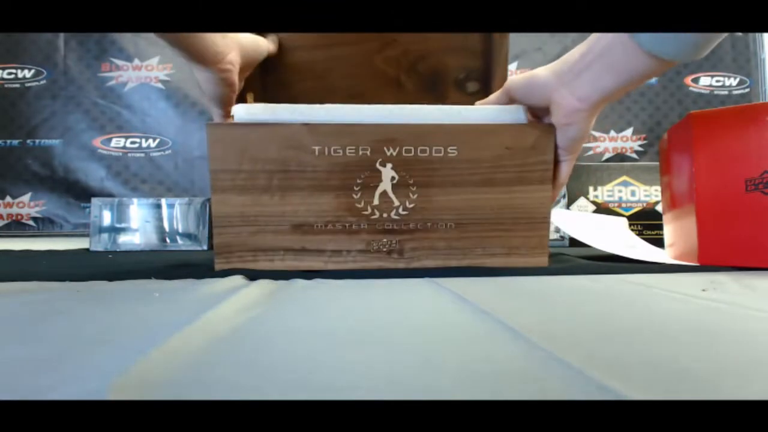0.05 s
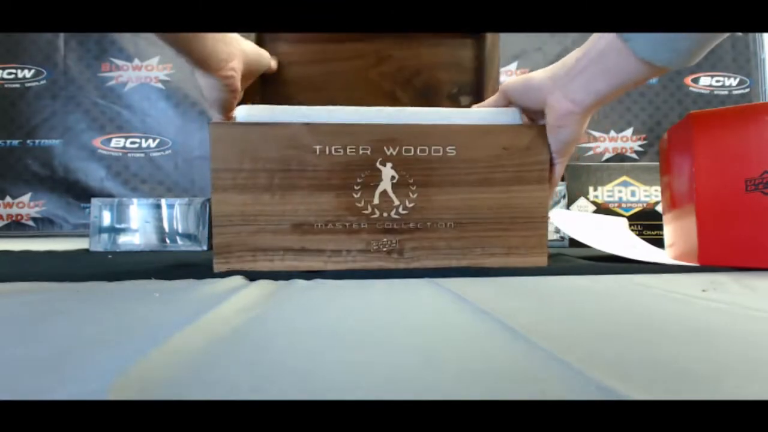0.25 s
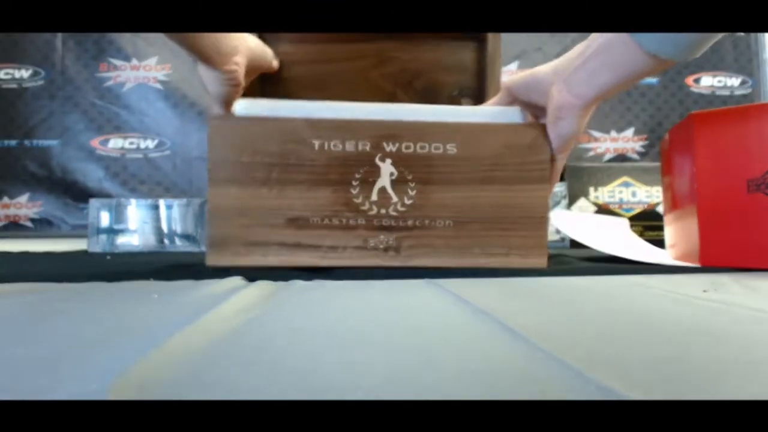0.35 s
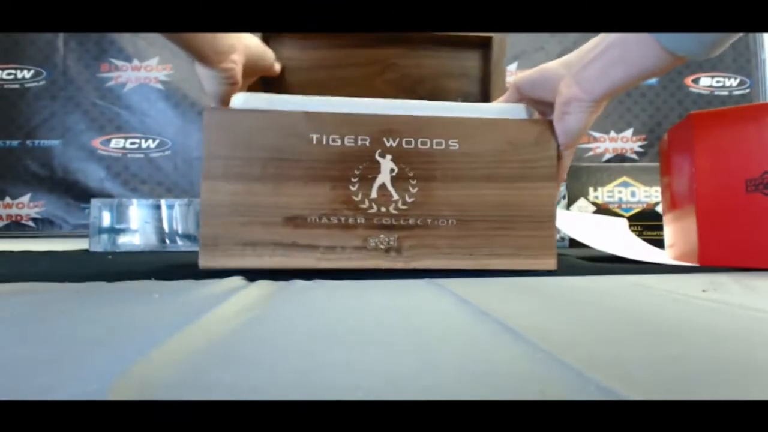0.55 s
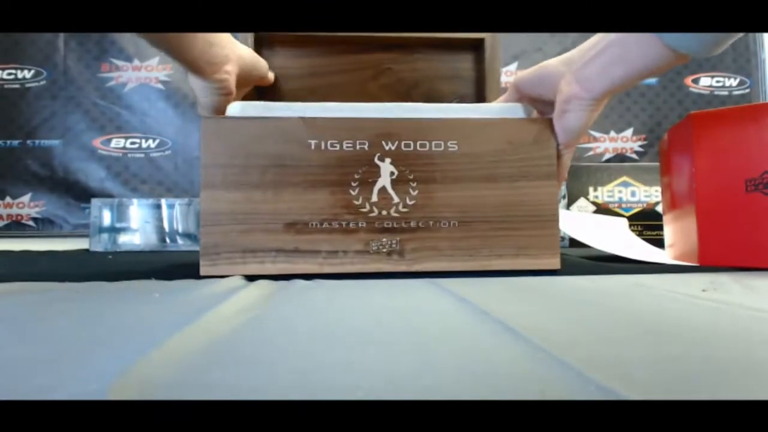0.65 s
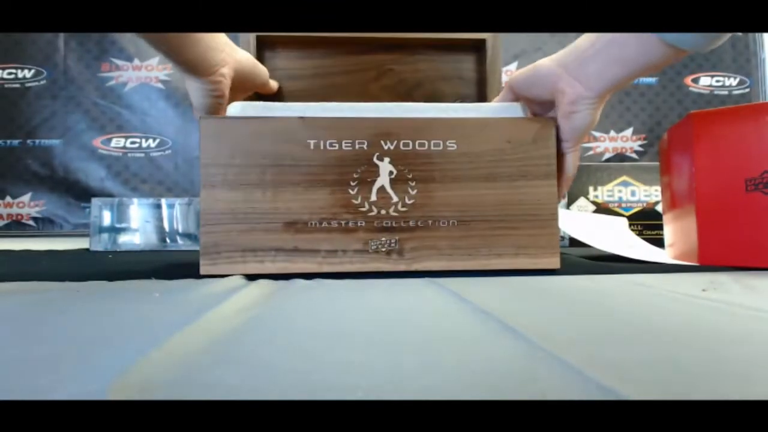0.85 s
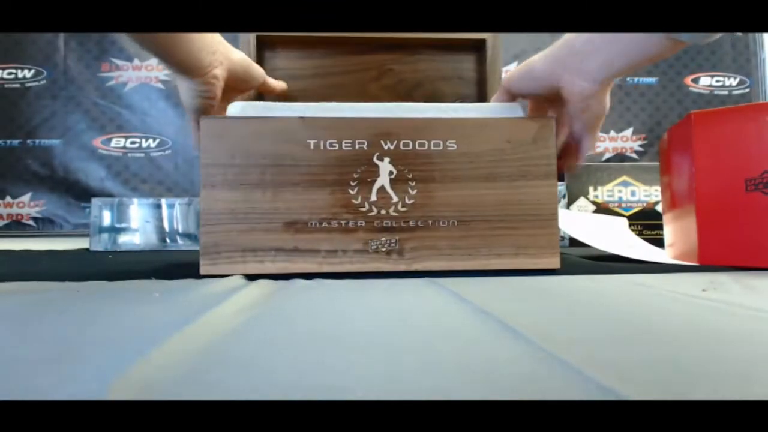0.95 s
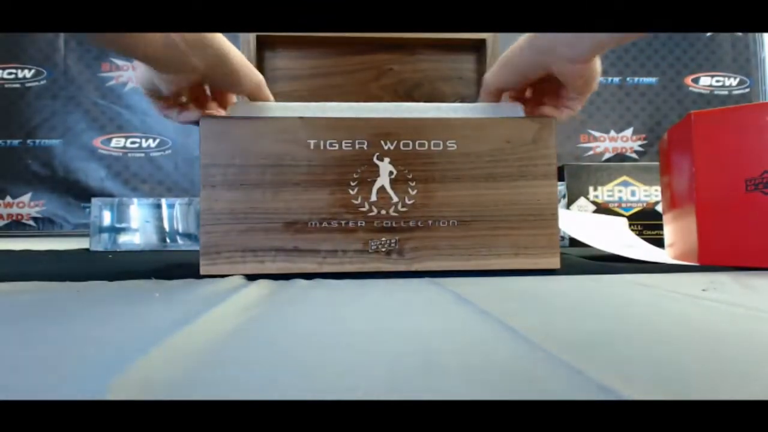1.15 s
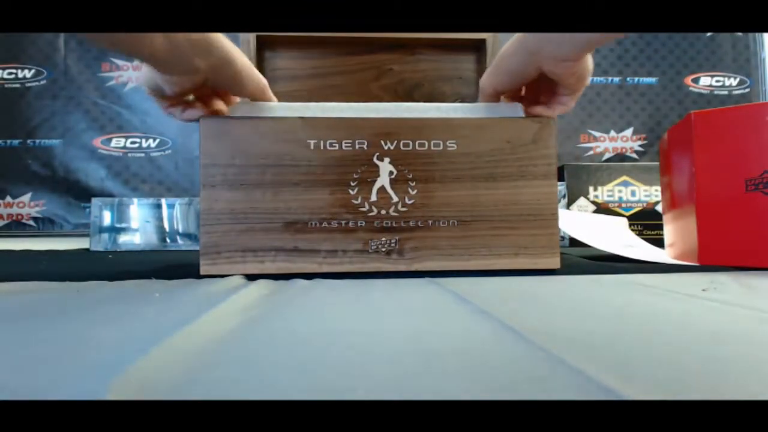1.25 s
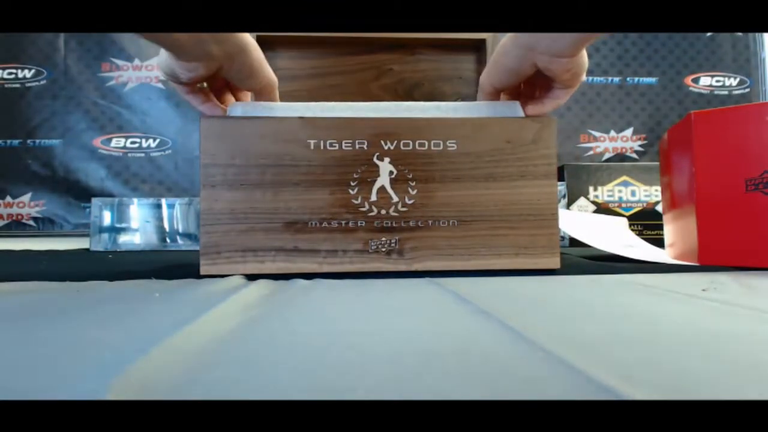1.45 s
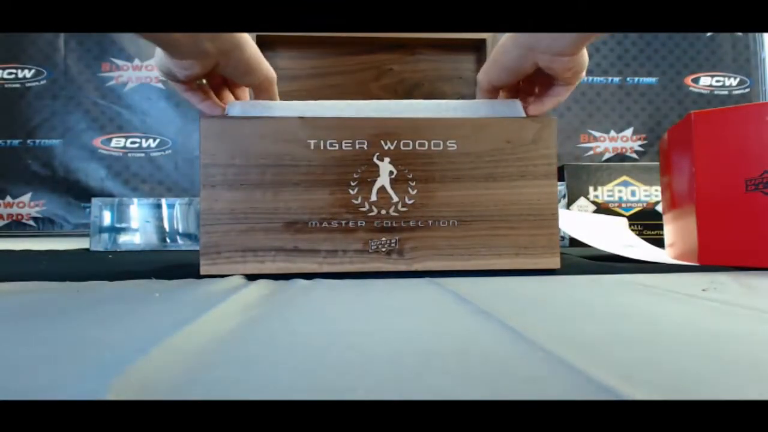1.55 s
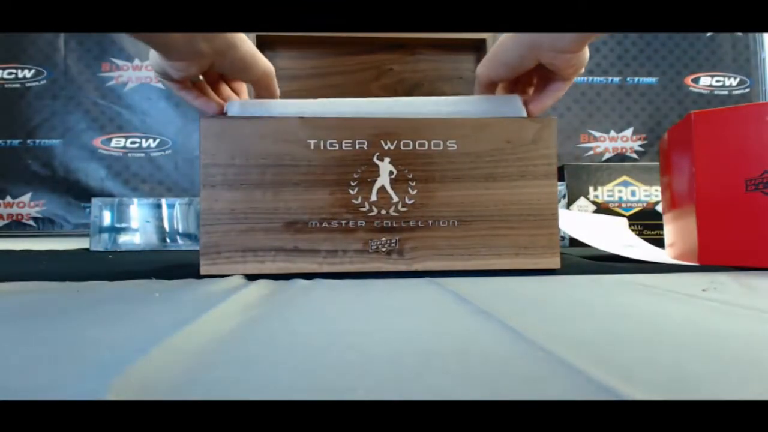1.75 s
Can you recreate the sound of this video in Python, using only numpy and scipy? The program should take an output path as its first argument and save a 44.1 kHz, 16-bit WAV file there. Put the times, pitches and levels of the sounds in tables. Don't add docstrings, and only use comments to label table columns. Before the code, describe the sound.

Wooden box handling: soft scraping and low thumps, a hollow triple knock, then faint foam rubbing

```python
import sys
import numpy as np
from scipy import signal
from scipy.io import wavfile
from scipy.ndimage import uniform_filter1d

SR = 44100
rng = np.random.default_rng(int(sys.argv[2]) if len(sys.argv) > 2 else 0)


def output_pcm(signal):
    pcm = np.clip(np.atleast_2d(signal).T, -1, 1) * 32767
    wavfile.write(sys.argv[1], SR, np.round(pcm).astype(np.int16))


def linear_from_db(decibels):
    return 10 ** (np.asarray(decibels, float) / 20)


N = 79380


def evened(x):
    return x / np.sqrt(np.mean(x ** 2) + 1e-20)


def curve(points):
    return np.interp(np.arange(N) / SR, *np.transpose(points))


def add(mix, start_s, sound):
    part = mix[round(start_s * SR):][:len(sound)]
    part += sound[:len(part)]


def body(x, peaks, tilt_db=0):
    out = 0
    for hz, width_hz, db in peaks:
        pole = np.exp((-np.pi * width_hz + 2j * np.pi * hz) / SR)
        gain = 1 - abs(pole)
        once = signal.lfilter([gain], [1, -pole], x)
        twice = signal.lfilter([gain], [1, -pole], once).real
        out = out + linear_from_db(db + tilt_db * np.log2(hz / 4000)) * twice
    return out


def ring(modes):
    t = np.arange(SR // 3) / SR
    return sum(linear_from_db(db - 60 * t / t60_s) * np.sin(2 * np.pi * hz * t) for hz, db, t60_s in modes)


def air(spectrum, level_db, patchy_db):
    bin_hz = np.fft.rfftfreq(2048, 1 / SR)
    real, imag, patches = rng.standard_normal((N // 512 + 5, 1025, 3)).T
    patches = uniform_filter1d(patches, size=14, axis=0)
    patches = evened(uniform_filter1d(patches, size=6, axis=1))
    hz, db = np.transpose(spectrum)
    colour_db = np.interp(np.log(bin_hz + 1), np.log(hz + 1), db, left=-100, right=-100)
    bins = (real + 1j * imag) * linear_from_db(colour_db[:, None] + patchy_db * patches)
    noise = signal.istft(bins, nperseg=2048, noverlap=1536)[1][:N]
    return linear_from_db(level_db) * evened(noise)


# f/Hz, density/dB per Hz
FAN_ROAR = [(40, -23.5), (70, -36.5), (130, -40.5), (200, -36), (400, -46), (700, -43.5), (1230, -39.5),
            (1500, -39.5), (1800, -54.5)]
# f/Hz, density/dB per Hz
MIC_HISS = [(1000, -17.5), (1700, 0), (1970, -2.5), (3470, -15), (4060, -13.5), (4540, -18), (15600, -26)]
# f/Hz, level/dB
MOTOR_LINES = [(60, -77.5), (89, -63.5)]
# f/Hz, width/Hz, level/dB
BLADE_TONES = [(1021, 60, 0), (1414.4, 72, 0)]


def room():
    t = np.arange(N) / SR
    out = air(FAN_ROAR, level_db=-49, patchy_db=0.98) + air(MIC_HISS, level_db=-64, patchy_db=1.8)
    for hz, db in MOTOR_LINES:
        waver_rad = 0.39 * np.sin(2 * np.pi * 2.3 * t + hz)
        out += linear_from_db(db + 8) * np.sin(2 * np.pi * hz * t + waver_rad)
    return out + linear_from_db(-60) * evened(body(rng.standard_normal(N), BLADE_TONES))


# t/s, level/dB
SWAY = [(0.0, -27.5), (0.06, -28.5), (0.19, -35), (0.314, -16), (0.376, -17.5), (0.426, -30.5), (0.49, -23),
        (0.59, -34), (0.686, -25), (0.772, -11), (0.852, -14.5), (0.926, -32), (1.088, -20), (1.228, -34.5),
        (1.348, -28), (1.405, -43), (1.45, -29), (1.55, -34), (1.8, -34.5)]
# f/Hz, width/Hz, level/dB
LEG_SHUDDER = [(27, 8, 0)]


def sway():
    rest_hz, sag_hz, crest_s = 20, 12.5, 0.804
    shudder_db = -22
    size = uniform_filter1d(linear_from_db(curve(SWAY) + 3), size=1200)
    turns = np.cumsum(rest_hz - sag_hz * size) / SR
    rocking = np.cos(2 * np.pi * (turns - turns[round(crest_s * SR)]))
    shudder = evened(body(rng.standard_normal(N), LEG_SHUDDER))
    return size * (rocking + linear_from_db(shudder_db) * shudder)


GRAINS_PER_S, GRAIN_SPREAD_DB = 6000, 3.0


def friction(stroke, peaks):
    hits = rng.random(N) < GRAINS_PER_S / SR
    sizes = linear_from_db(GRAIN_SPREAD_DB * np.minimum(rng.exponential(1, N), 4))
    grains = hits * sizes * rng.choice([-1., 1.], N)
    return linear_from_db(curve(stroke)) * evened(body(grains, peaks))


# t/s, level/dB
SLIDE = [(0, -77), (.1, -66), (.17, -63), (.2, -60.5), (.33, -64.5), (.4, -60.5), (.435, -54.5),
         (.475, -69), (.51, -56.5), (.58, -58), (.65, -62.5), (.69, -66), (.712, -54), (.76, -64.5),
         (.8, -75.5), (1.16, -75), (1.26, -63.5), (1.4, -72)]
# f/Hz, width/Hz, level/dB
SLIDE_BODY = [(130, 110, 16.5), (2120, 1800, 6), (4260, 1200, -1), (7280, 2000, -7.5), (9140, 2500, -14),
              (11800, 4600, -18)]


def slide():
    return friction(SLIDE, SLIDE_BODY)


# t/s, level/dB, f/Hz, t60/s, direction/sign
THUMPS = [(.172, -27.5, 104, 0.13, -1), (0.183, -19, 47.5, 0.19, -1), (0.195, -22.5, 62.8, 0.16, 1),
          (.19, -41, 295, 0.15, 1), (0.242, -23, 42, 0.18, 1), (0.261, -30, 29.3, 0.58, 1),
          (.351, -37, 620, 0.045, 1), (.353, -41, 500, .04, 1), (.735, -36, 540, .08, 1),
          (.2, -42, 200, .12, 1), (1.35, -48, 480, .05, 1), (1.62, -50.5, 199.7, 0.27, 1),
          (.86, -38.5, 95, 0.19, 1), (.698, -36, 250, 0.059, 1), (0.374, -27.5, 77.5, 0.099, 1),
          (0.383, -39.5, 205, 0.14, 1), (0.406, -36.5, 111.8, .2, 1), (0.527, -38.5, 85, 0.11, 1),
          (0.584, -32, 33, 0.47, 1), (.61, -40.5, 119, 0.17, 1), (.64, -47.5, 197, 0.23, 1),
          (0.702, -12.5, 33.2, 0.41, 1), (0.704, -16, 62, 0.15, 1), (.728, -26, 371, 0.11, 1),
          (.755, -33, 63.6, 0.17, 1), (0.999, -32.5, 37.6, 0.33, 1), (1.171, -47, 130, 0.14, 1),
          (1.222, -47, 190, 0.084, 1), (1.261, -45, 150, .1, 1), (1.29, -47, 179, .1, 1),
          (1.26, -46, 620, 0.06, 1), (1.25, -39, 29.6, 0.25, 1), (1.401, -53, 44.6, 0.23, 1),
          (1.739, -39, 40.4, 0.22, 1)]


def thumps():
    rise_s = 0.0039
    out, t = np.zeros(N), np.arange(SR // 2) / SR
    rise = 1 - np.exp(-t / rise_s)
    for start_s, db, hz, t60_s, direction in THUMPS:
        decay = linear_from_db(db - 60 * t / t60_s)
        add(out, start_s, np.sign(direction) * rise * decay * np.sin(2 * np.pi * hz * t))
    return out


# t/s, length/s, level/dB, rate/slips per s
CHATTER = [(.7225, .001, -33, 330), (.7265, .001, -35, 330), (.7305, .001, -40, 330),
           (.7365, .001, -35, 300), (.7415, .001, -37, 330), (.749, .001, -43, 330), (.768, .001, -44, 330),
           (.875, .02, -56, 250), (.354, .001, -46, 232), (.3612, .006, -43, 230), (.1757, .085, -49, 200),
           (.549, .015, -46, 250), (.622, .01, -46, 250), (.603, .012, -47, 250), (1.275, .008, -50, 270),
           (1.617, .008, -49, 247)]
# f/Hz, level/dB, t60/s
LID = [(556, -9.5, 0.035), (880, -2.5, 0.025), (1050, 0, 0.03), (1210, 4, 0.031), (1240, -4, 0.039),
       (1360, -21, .05)]


def chatter():
    slip_s, level_spread_db = 0.00073, 5.1
    slips = np.zeros(N)
    for (start_s, length_s, db, rate_hz), (gap, drop) in zip(CHATTER, rng.random((len(CHATTER), 2, 30))):
        at_s = np.cumsum(0.4 + 1.3 * gap) / rate_hz
        at_s = at_s - at_s[0]
        inside = at_s < length_s
        slips[((start_s + at_s[inside]) * SR).astype(int)] += linear_from_db(db - level_spread_db * drop[inside])
    push = np.sin(np.pi * np.arange(0, slip_s, 1 / SR) / slip_s) ** 2
    return signal.fftconvolve(slips, np.convolve(push / push.sum(), ring(LID)))[:N]


# t/s, level/dB, tilt/dB per octave, t60/s
TICKS = [(.1757, -43, -6, .06), (.317, -54, -8, 0.064), (0.31, -60, 0, .015), (.3538, -44, -5.5, 0.051),
         (.3612, -47.5, -4, 0.037), (.5505, -55, 0, 0.027), (.7347, -49, -5.5, 0.095),
         (.7295, -56, -2, .015), (.7, -59.5, 0.5, .08), (0.54, -59.5, 2, .03), (1.1, -66, -7.5, 0.054),
         (0.41, -50, -14, 0.054), (0.45, -60, -16, 0.046), (1.7738, -58.5, -1, .08)]
# f/Hz, width/Hz, level/dB
TICK_BODY = [(1330, 1000, 2), (2020, 1350, -1), (3270, 620, 3), (4230, 640, 6.5), (6500, 850, -4),
             (7640, 1300, -8.5), (9600, 1200, -17.5), (13000, 1500, -12)]


def ticks():
    rise_s, strike = 0.0002, 5
    out, t = np.zeros(N), np.arange(4000) / SR
    contact = strike * signal.unit_impulse(len(t), 12)
    for (start_s, db, tilt_db, t60_s), crackle in zip(TICKS, rng.standard_normal((len(TICKS), len(t)))):
        envelope = np.minimum(t / rise_s, 1) * linear_from_db(db - 60 * t / t60_s)
        add(out, start_s, envelope * evened(body(crackle + contact, TICK_BODY, tilt_db)))
    return out


# t/s, level/dB
FOAM_POPS = [
    (1.6177, -52),
    (1.7035, -64),
    (.2887, -63),
]
# f/Hz, level/dB, t60/s
FOAM_EDGE = [(7300, -2, .012), (9500, -1, 0.011), (13000, -1.5, .012), (2100, -1, .015)]


def foam_pops():
    out = np.zeros(N)
    for start_s, db in FOAM_POPS:
        add(out, start_s, linear_from_db(db) * ring(FOAM_EDGE))
    return out


# t/s, length/s, level/dB, f/Hz
SQUEAKS = [
    (1.188, .03, -65, 3300),
    (.49, .022, -54, 2300),
    (.412, .028, -65, 4200),
    (.875, .02, -63, 2400),
]


def squeaks():
    out = np.zeros(N)
    for start_s, length_s, db, hz in SQUEAKS:
        progress = np.clip((np.arange(N) / SR - start_s) / length_s, 0, 1)
        rough = evened(body(rng.standard_normal(N), [(hz, 200, 0)]))
        out += linear_from_db(db) * np.sin(np.pi * progress ** 0.6) * rough
    return out


# t/s, level/dB, contact/s, ring/dB, tilt/dB per octave
KNOCKS = [
    (.7675, -20.5, 0.004, 4.5, 1),
    (.7795, -20, 0.0041, 2.5, 0),
    (.8295, -18.5, 0.004, 3, 1),
    (.858, -31.5, 0.0039, -3.5, -1),
    (.7955, -27, 0.0046, 0.5, -1),
    (.733, -28.5, 0.0041, -1, 0.5),
    (.75, -28, 0.0072, 2.5, -0.5),
]
# f/Hz, level/dB, t60/s
BOX = [(113.3, 4, 0.085), (143.6, -5, .18), (182.8, -5, 0.2), (224, -11, 0.12), (302, -18, .09),
       (360.4, -6.5, 0.15), (499, -13.5, 0.068), (534, -20.5, 0.12), (600.6, -11, 0.078),
       (681, -24.5, 0.081), (777, -14, 0.062), (260.5, -13.5, .1)]


def knocks():
    rise_s, spot_db, detune = 0.001, 1.0, 0.006
    out, rise = np.zeros(N), 1 - np.exp(-np.arange(SR // 3) / SR / rise_s)
    spots = rng.standard_normal((len(KNOCKS), len(BOX), 2))
    for (start_s, db, contact_s, ring_db, tilt_db), spot in zip(KNOCKS, spots):
        push = np.sin(np.pi * np.arange(0, contact_s, 1 / SR) / contact_s) ** 2
        modes = []
        for (hz, mode_db, t60_s), (shift, favour) in zip(BOX, spot):
            struck_db = mode_db + spot_db * favour + tilt_db * np.log2(hz / 250)
            modes.append((hz * (1 + detune * shift), struck_db, t60_s))
        add(out, start_s, -linear_from_db(db) * push)
        add(out, start_s, -linear_from_db(db + ring_db - 7) * rise * ring(modes))
    return out


# f/Hz, level/dB, t60/s
HINGE = [(3650, 0, .02), (4300, -5, .03), (4800, -6, .015), (5600, -8, .012), (6500, -2, .015),
         (7100, -5, .015), (8200, -5, .015), (9000, -12, .012)]


def hinge_snap():
    start_s, level_db, rise_s = 0.778, -47, 0.0012
    out, sound = np.zeros(N), ring(HINGE)
    t = np.arange(len(sound)) / SR
    rise = np.sin(np.pi / 2 * np.minimum(t / rise_s, 1)) ** 2
    add(out, start_s, linear_from_db(level_db) * sound * rise)
    return out


# t/s, level/dB
RUB = [(1.57, -88), (1.595, -65), (1.63, -57), (1.67, -61.5), (1.7, -73), (1.76, -70.5), (1.775, -67.5),
       (1.8, -58)]
# f/Hz, width/Hz, level/dB
RUB_BODY = [(2100, 920, 4), (3160, 2200, 1.5), (4870, 2500, 3), (7000, 2700, -2), (9140, 3800, -4),
            (12600, 5000, -18)]


def rub():
    return friction(RUB, RUB_BODY)


def scene():
    steady = room() + sway() + slide()
    handling = thumps() + chatter() + ticks() + foam_pops() + squeaks()
    landing = knocks() + hinge_snap()
    return (steady + handling + landing + rub())[None]


def band_limit(x):
    return signal.sosfilt(signal.butter(12, 15710, fs=SR, output="sos"), x)


def record(dry):
    return band_limit(dry)


dry = scene()
out = record(dry)
output_pcm(out)
```